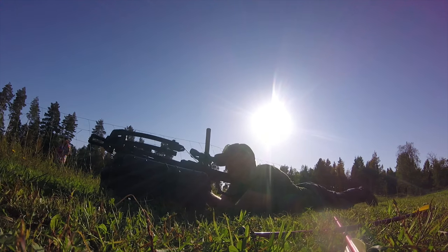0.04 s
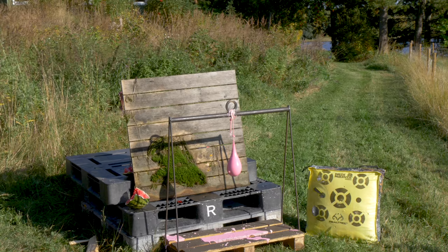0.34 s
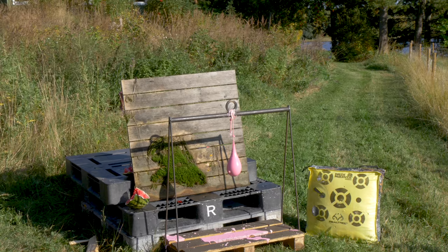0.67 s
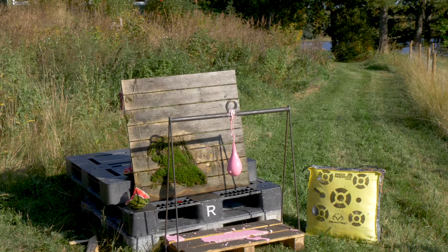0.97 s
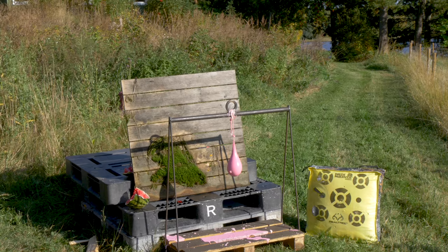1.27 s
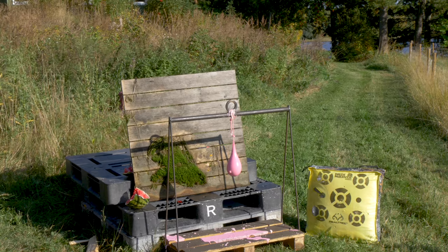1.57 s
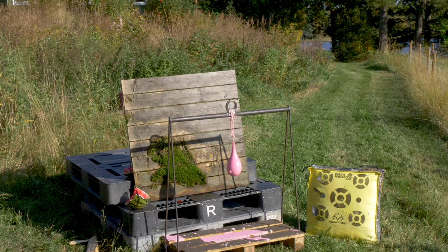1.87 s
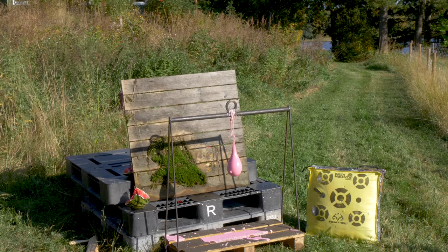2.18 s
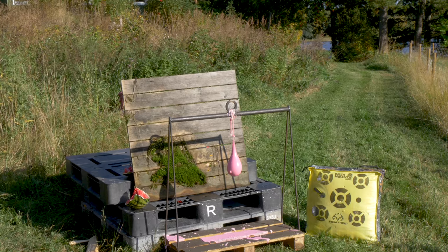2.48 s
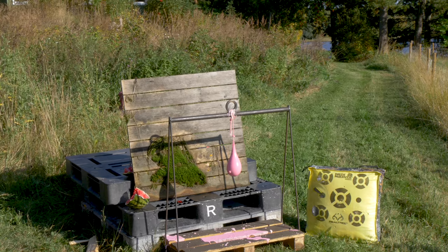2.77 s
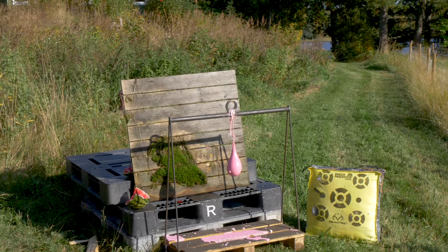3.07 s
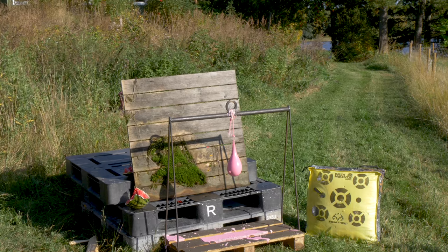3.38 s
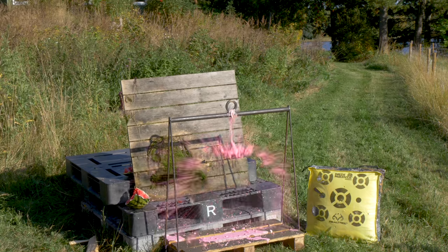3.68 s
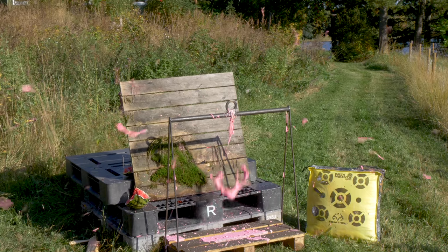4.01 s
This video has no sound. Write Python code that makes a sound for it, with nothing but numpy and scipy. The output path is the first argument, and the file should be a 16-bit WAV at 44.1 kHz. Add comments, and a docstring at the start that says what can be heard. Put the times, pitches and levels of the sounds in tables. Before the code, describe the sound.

Light wind buffets the microphone throughout in an open meadow, a soft low rumble with gusts around 1.1 and 3.2 seconds. A very faint grasshopper hiss gives way at 0.3 seconds to barely audible distant trees and a thin, high cricket rasp. At 3.1 seconds a crossbow gives a faint, far-off clack, and at about 3.3 a distant bird makes one quiet rising chirp. At 3.65 seconds the bolt bursts a paint balloon with a loud, bright snap, a short rip and a brief ring from its steel hanger. A split second later, at 3.7, it slams into a wooden board beside the microphone with a splintering crack, knock and short rattle, slightly overloading. The two hits form one sharp double crack. From 3.8 seconds to the end, around 4.3, paint comes down more quietly on pallets and grass in fine pattering drops, dull plops and small splashes.

```python
"""Grasshoppers hiss in a quiet spot; then the scene changes to a meadow with distant trees and a
bush-cricket. Light wind buffets the microphone throughout. A crossbow clacks far off and a bird calls.
The bolt bursts a paint balloon, whose steel hanger rings, and slams into a board beside the microphone,
which overloads. Paint then patters and plops on pallets and grass. Struck bodies ring in damped modes;
turbulence, tearing and splashing are shaped noise."""
import sys
import numpy as np
from scipy import signal
from scipy.fft import rfft, irfft, next_fast_len
from scipy.io import wavfile
from scipy.ndimage import uniform_filter1d, minimum_filter1d, map_coordinates

SR = 44100
rng = np.random.default_rng(int(sys.argv[2]) if len(sys.argv) > 2 else 0)


def digitize_waveform(pressure):
    """Quantize a signal to 16-bit integers and store it at the path in sys.argv[1].

    Rows of a 2-D input are taken as channels; values are limited to [-1, 1].
    """
    field = np.atleast_2d(pressure).T
    bounded = np.clip(field, -1, 1)
    quanta = np.round(bounded * 32767).astype(np.int16)
    wavfile.write(sys.argv[1], SR, quanta)


N = 187336
SCENE_CHANGE_S = .2755


def amp(db):
    """Amplitude ratio of a level in decibels."""
    return 10 ** (np.asarray(db) / 20)


def unit(x):
    """Normalisation to rms 1."""
    return x / np.sqrt(np.mean(x ** 2) + 1e-20)


def since(s):
    """Seconds since s for every sample, zero before it."""
    return np.maximum(np.arange(N) / SR - s, 0)


def wobble(rate):
    """Smooth random modulation: a spline through rate knots a second."""
    return map_coordinates(rng.standard_normal(int(N * rate / SR) + 4), [since(0) * rate])


def filtered(x, response):
    """Linear filtering: the spectrum of x times a frequency response."""
    m = next_fast_len(N + SR // 2)
    return irfft(rfft(x, m) * response(np.fft.rfftfreq(m, 1 / SR)), m)[:N]


def coloured(x, spectrum):
    """Spectral shaping of x by (f/Hz, relative level/dB) points, at rms 1."""
    f, db = np.transpose(spectrum)
    return unit(filtered(x, lambda hz: amp(np.interp(np.log(hz + 1), np.log(f), db))))


def noise(spectrum):
    """Gaussian noise with the given shape of spectral density, at rms 1."""
    return coloured(rng.standard_normal(N), spectrum)


def decay(s, t60, attack):
    """Exponential decay after a blow at time s: 60 dB in t60 seconds."""
    t = since(s)
    return np.exp(-np.minimum(np.log(1000) * t / t60, 50)) * (1 - np.exp(-t / attack))


def bursts(rows, spectrum, attack):
    """Incoherent addition: the powers of noisy blows sum."""
    power = sum((amp(db) * decay(s, t60, attack)) ** 2 for s, db, t60 in rows)
    return noise(spectrum) * np.sqrt(power)


def damped_sine(s, db, hz, t60, attack, phase=0):
    """Free vibration of a damped oscillator struck at time s."""
    return amp(db) * decay(s, t60, attack) * np.sin(2 * np.pi * hz * since(s) + phase)


def ring(s, modes, attack):
    """Superposition of modes struck at time s, their levels scattered by about 1 dB."""
    return sum(damped_sine(s, db + rng.normal(), hz, t60, attack) for hz, db, t60 in modes)


# Spectrum of the buffeting: f/Hz, relative level/dB
WIND_SPECTRUM = [(15, 3), (30, 5), (50, 5.5), (75, 2.5), (110, -3), (160, -12.5), (250, -22.5), (500, -54),
                 (1500, -76)]
# Gusts: crest t/s, level/dB, length/s
WIND_GUSTS = [(.39, -44, .16), (0.504, -38.5, .035), (.79, -42, .05), (1.06, -30.5, 0.071),
              (1.19, -31, .07), (1.796, -40.5, .045), (2.258, -44.5, .17), (3.24, -37, .36)]

def wind():
    """Turbulent pressure at the microphone: gusts swell and ease off over a fluttering breeze."""
    breeze_power = amp(-48) ** 2
    gust_power = sum((amp(db) / np.cosh(2 * (since(0) - s) / length)) ** 2
                     for s, db, length in WIND_GUSTS)
    flutter = amp(0.6 * wobble(rate=14))
    return np.sqrt(breeze_power + gust_power) * flutter * noise(WIND_SPECTRUM)


# Spectra of the foliage and of the grasshoppers' spot: f/Hz, relative level/dB
TREE_SPECTRUM = [(80, -4.5), (250, -1), (500, -2.5), (900, 2.5), (1500, -7.5), (2200, -12), (3300, -16),
                 (4800, -25), (8000, -26.5), (12000, -25.5), (14000, -24.5), (16000, -25.5)]
GRASSHOPPER_SPECTRUM = [(100, 3.5), (400, -2), (1000, -8.5), (2500, -15), (5700, -25), (6500, -7),
                        (7300, -14.5), (9000, -18.5), (11000, -24), (16000, -33)]

def grasshoppers_then_trees():
    """Many incoherent sources merge into noise: first grasshoppers, then a slowly growing rustle."""
    growth_db_per_s = 0.72
    trees = amp(-59.5 + growth_db_per_s * since(SCENE_CHANGE_S)) * noise(TREE_SPECTRUM)
    grasshoppers = amp(-61.5) * noise(GRASSHOPPER_SPECTRUM)
    return np.where(since(0) < SCENE_CHANGE_S, grasshoppers, trees)


# Spectrum of the wing rasp: f/Hz, relative level/dB
RASP_SPECTRUM = [(10500, -28), (12300, -14), (13600, -4.5), (14800, -7), (16000, -14)]

def bush_cricket():
    """Stridulation: the wings close in quick strokes of uneven strength, slowly easing off."""
    strokes_per_s, fade_db_per_s = 50, .6
    phase = np.cumsum(strokes_per_s * (1 + 0.147 * wobble(20))) / SR % 1
    strokes = amp(-25 * phase + 2.3 * wobble(45)) * (1 - np.exp(-phase / .04))
    t = since(SCENE_CHANGE_S)
    return amp(-72.5 - fade_db_per_s * t) * unit(strokes) * noise(RASP_SPECTRUM) * (t > 0)


# Pitch contour of the call: t/s, f/Hz
CALL_PITCH = [(3.27, 2620), (3.30, 2850), (3.33, 3300), (3.357, 3360), (3.38, 3750), (3.40, 4180),
              (3.415, 4380)]

def bird():
    """Frequency modulation: one upslurred call swells and breaks off; trees scatter a faint tail."""
    crest_s, rise_s, fall_s = 3.378, .065, .025
    hz = np.interp(since(0), *np.transpose(CALL_PITCH)) * (1 + 0.0079 * wobble(300))
    t = since(0) - crest_s
    swell = np.exp(-(t / np.where(t < 0, rise_s, fall_s)) ** 2)
    call = amp(-56.5) * swell * np.sin(2 * np.pi * np.cumsum(hz) / SR)
    echoes = rng.standard_normal(N) * decay(0, t60=.35, attack=.01)
    return call + amp(-7) * signal.fftconvolve(call, echoes / np.linalg.norm(echoes))[:N]


# Spectrum of the distant release: f/Hz, relative level/dB
RELEASE_SPECTRUM = [(800, -20), (1500, -4), (2000, 3), (2600, -12), (3600, -19), (4100, -5), (4800, -25),
                    (5800, -20), (8000, -41)]

def crossbow():
    """Propagation over a long distance smears the release into a soft clack."""
    return amp(-59) * decay(3.10, t60=0.98, attack=0.014) * noise(RELEASE_SPECTRUM)


# Showers of spray: t/s, level/dB, rise/s, T60/s
SPRAY_SHOWERS = [(3.788, -21.5, 0.024, 0.12), (3.865, -30, 0.017, 0.74), (3.935, -36.5, .015, 0.34)]
# Heavy blobs landing: t/s, level/dB, f/Hz, T60/s
BLOB_PLOPS = [(3.8176, -19, 290, 0.036), (3.84, -30, 172, 0.13), (3.905, -28, 191, 0.088),
              (3.938, -29.5, 160, 0.1), (4.003, -37, 265, 0.035), (4.149, -38, 172, 0.07),
              (4.189, -30.5, 1850, 0.038), (4.213, -32.5, 605, 0.075), (4.227, -31.5, 645, 0.083),
              (4.242, -31, 140, .07)]
# Splashes on wood: t/s, level/dB, T60/s
SPLASHES = [(3.793, -36, 0.027), (3.881, -33.5, 0.045), (4.08, -37, 0.052), (4.1668, -21, 0.014),
            (4.188, -34.5, 0.058), (4.2062, -29.5, 0.037), (4.228, -39, 0.04)]
# Spectra of fine drops and of splashes: f/Hz, relative level/dB
DROP_SPECTRUM = [(100, 5), (200, 0), (450, -6.5), (750, -6), (1200, -0.5), (1700, -4), (2300, -0.5),
                 (3400, -6), (5000, -21), (8000, -28.5), (16000, -40.5)]
SPLASH_SPECTRUM = [(200, 8.5), (800, 2), (1300, 16), (2000, 4), (3500, 8.5), (5000, -5), (9000, -15),
                   (16000, -24)]

def paint():
    """Shot noise: fine drops patter at random, while heavy blobs land dully and a few splash on wood."""
    drops_per_s, drizzle_start_s, drizzle_rise_s = 4500, 3.78, 0.11
    drops = (rng.random(N) < drops_per_s / SR) * rng.standard_normal(N)
    shower_power = sum((amp(db) * decay(s, t60, rise)) ** 2 for s, db, rise, t60 in SPRAY_SHOWERS)
    drizzle = amp(-44) * (1 - np.exp(-since(drizzle_start_s) / drizzle_rise_s))  # stray drops go on
    spray = np.sqrt(shower_power + drizzle ** 2) * coloured(drops, DROP_SPECTRUM)
    blobs = sum(damped_sine(s, db, hz, t60, attack=0.00052, phase=1.12 * wobble(300))
                for s, db, hz, t60 in BLOB_PLOPS)
    return spray + blobs + bursts(SPLASHES, SPLASH_SPECTRUM, attack=0.00017)


# The tip snaps through the skin, which then tears and slaps: t/s, level/dB, T60/s
SKIN_SNAPS = [(3.6426, 5.5, 0.0055), (3.6452, -15, 0.021)]
SKIN_TEARS = [(3.6412, -16.5, 0.07), (3.6491, -12.5, 0.053), (3.659, -29, 0.35), (3.6725, -18.5, 0.038),
              (3.6795, -16, 0.027)]
# Spectrum of the tearing: f/Hz, relative level/dB
TEAR_SPECTRUM = [(50, -22), (160, -1.5), (400, -13.5), (600, -4), (850, -4.5), (1200, -3.5), (1900, -7),
                 (2800, -9), (3800, -1.5), (5000, -11.5), (8000, -14.5), (13000, -22), (16000, -35)]
# Modes of the steel hanger: f/Hz, level/dB, T60/s
HANGER_MODES = [(335, -22.5, 0.21), (840, -22, 0.1), (1220, -28, 0.28), (2430, -29, 0.25),
                (3370, -28.5, 0.22), (3590, -27, 0.17), (3790, -24, 0.14), (3860, -32, .12)]

def balloon():
    """Rupture of a taut membrane: a bright snap, then the skin rips and sets its hanger ringing."""
    snap = sum(damped_sine(s, db, hz=3560, t60=t60, attack=0.00035) for s, db, t60 in SKIN_SNAPS)
    rip = bursts(SKIN_TEARS, TEAR_SPECTRUM, attack=0.00081)
    return snap + rip + ring(3.6495, HANGER_MODES, attack=0.00068)


# Modes of the fibres around the moving shaft and of the board: f/Hz, relative level/dB, T60/s
FIBRE_MODES = [(263, -15.5, 0.039), (444, -22, 0.07), (840, -6, 0.069), (1430, -11, .05),
               (1830, -2.5, 0.038), (2270, -7, 0.032), (2550, -10, .025)]
BOARD_MODES = [(134, -35, 0.11), (186, -26.5, 0.096), (236, -29.5, 0.31), (313, -22, .035),
               (460, -23, 0.028), (886, -12.5, 0.063), (1076, -5.5, 0.029), (1270, -8.5, 0.024),
               (1675, -29, .1), (1850, -30, 0.13), (2134, -18.5, 0.08), (2550, -25, 0.11),
               (2960, -33, 0.16), (3270, -15.5, 0.041), (3750, -14, 0.034)]
# The board rattles on its pallet: t/s, level/dB, T60/s
PALLET_RATTLES = [(3.7105, -7.5, 0.017), (3.7148, -24, 0.053), (3.727, -21, 0.074), (3.745, -34.5, 0.48)]
# Spectra of splitting wood and of the rattle: f/Hz, relative level/dB
SPLIT_SPECTRUM = [(50, -26), (300, 5.5), (700, -14), (1400, -3.5), (2500, 2), (3700, 3.5), (4800, -6),
                  (8000, -15), (13000, -14), (16000, -17)]
RATTLE_SPECTRUM = [(50, -17), (150, 6.5), (250, -2.5), (450, 8.5), (600, -2), (850, 0), (1300, -3.5),
                   (2300, -7), (3600, -9.5), (5000, -22), (9000, -32), (16000, -47)]

def board():
    """Fracture, then impulse excitation: the bolt splits the plank, stops dead and knocks it."""
    entry_s, travel_s, stop_t60_s, knock_s = 3.7029, .0039, 0.0043, 3.7105
    piercing = amp(-60 * since(entry_s + travel_s) / stop_t60_s)  # the crack dies as the shaft stops
    splinters = amp(-3.0) * decay(entry_s, t60=0.16, attack=0.00015) * noise(SPLIT_SPECTRUM)
    crack = piercing * (splinters + ring(entry_s, FIBRE_MODES, attack=0.00025))
    knock = amp(0.5) * ring(knock_s, BOARD_MODES, attack=0.0002)
    return crack + knock + bursts(PALLET_RATTLES, RATTLE_SPECTRUM, attack=0.00026)


def scene():
    """Superposition: the sound pressures add at one microphone in the open air."""
    background = wind() + grasshoppers_then_trees() + bush_cricket() + bird()
    return (background + crossbow() + paint() + balloon() + board())[None]


def gain_control(x):
    """Dynamic compression: a loud passage turns the gain down; it is held there, then recovers."""
    threshold_db, lag_s = -18, .03
    window, hold = round(.02 * SR), round(.2 * SR)
    mean_square = uniform_filter1d(x ** 2, window, origin=(window - 1) // 2)
    rms = np.sqrt(np.abs(mean_square) + 1e-12)
    log_gain = np.minimum(np.log(amp(threshold_db) / rms), 0)
    held = minimum_filter1d(log_gain, hold, origin=(hold - 1) // 2)
    step = 1 / (lag_s * SR)
    return x * np.exp(signal.lfilter([step], [1, step - 1], held))


def record(dry):
    """Saturation rounds the loudest peaks, the gain ducks after them, and filters limit the band."""
    ceiling, hardness = .75, 6
    low_cut_hz, high_cut_hz = 70, 16000
    clipped = dry[0] / (1 + np.abs(dry[0] / ceiling) ** hardness) ** (1 / hardness)
    high_pass = signal.butter(2, low_cut_hz, "high", fs=SR, output="sos")
    thinned = signal.sosfilt(high_pass, gain_control(clipped))
    return filtered(thinned, lambda hz: 1 / np.sqrt(1 + (hz / high_cut_hz) ** 160))[None]


dry = scene()
out = record(dry)
digitize_waveform(out)
```